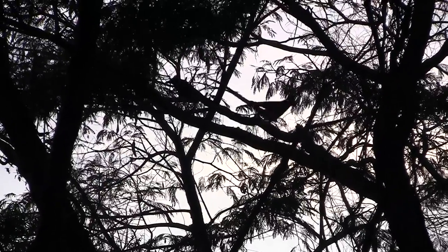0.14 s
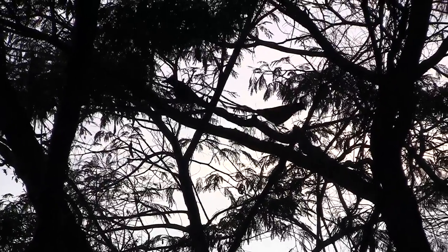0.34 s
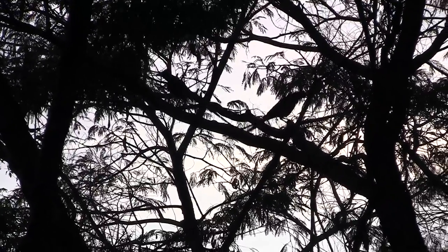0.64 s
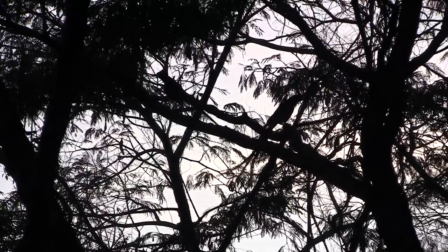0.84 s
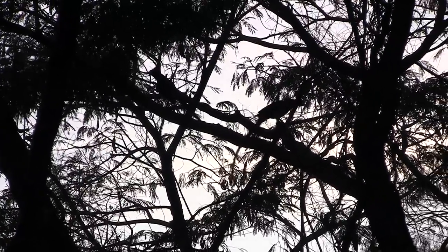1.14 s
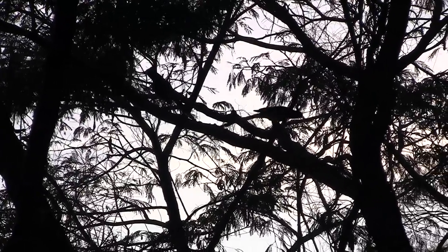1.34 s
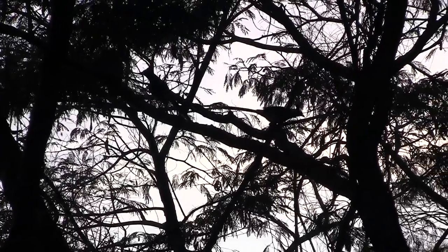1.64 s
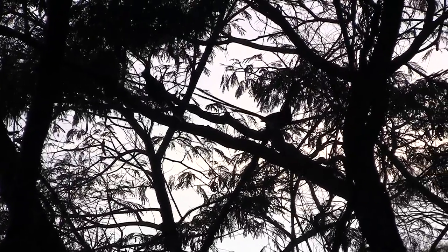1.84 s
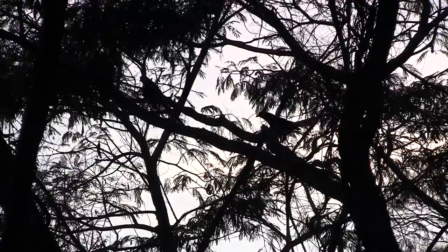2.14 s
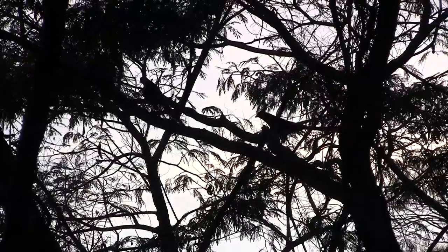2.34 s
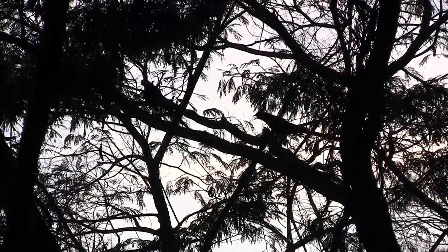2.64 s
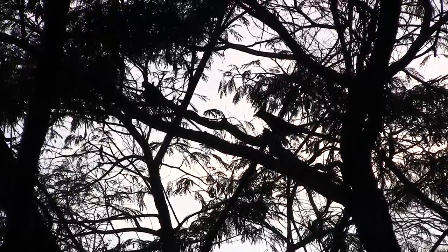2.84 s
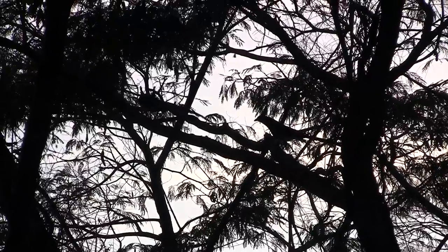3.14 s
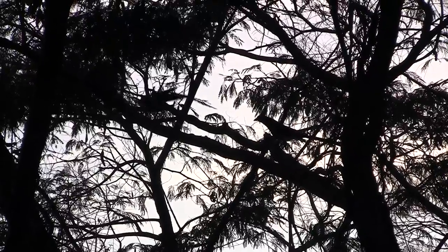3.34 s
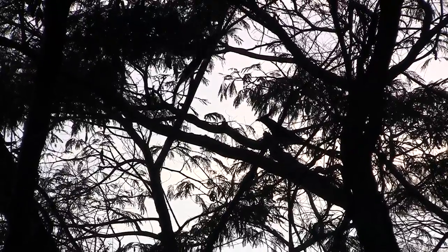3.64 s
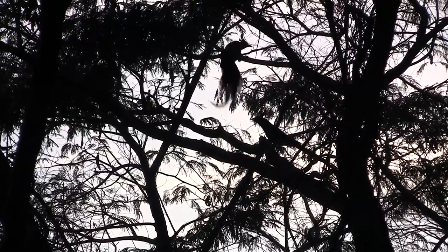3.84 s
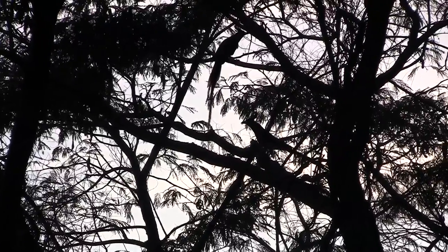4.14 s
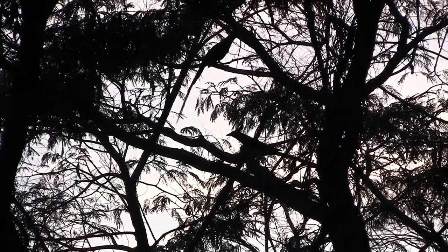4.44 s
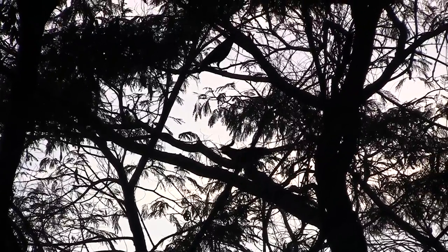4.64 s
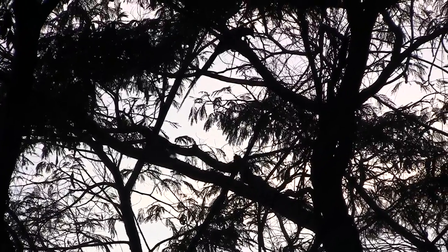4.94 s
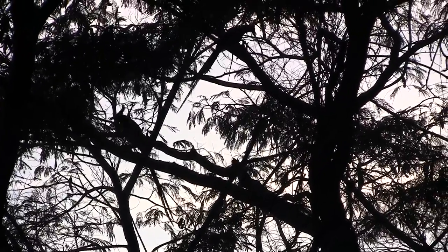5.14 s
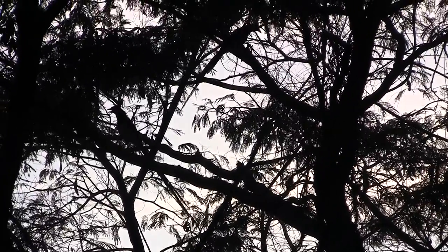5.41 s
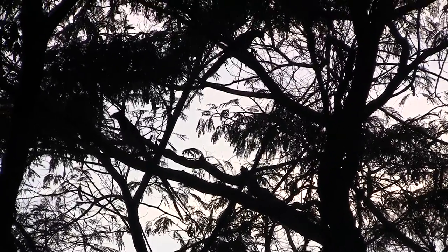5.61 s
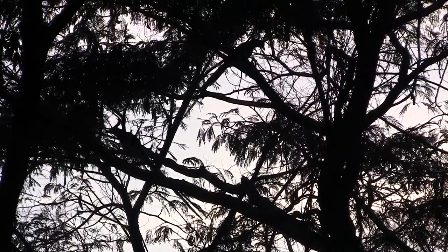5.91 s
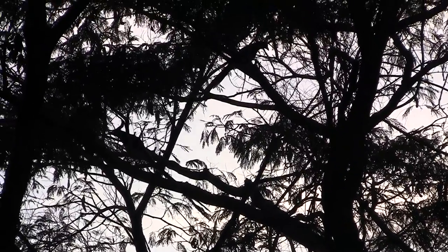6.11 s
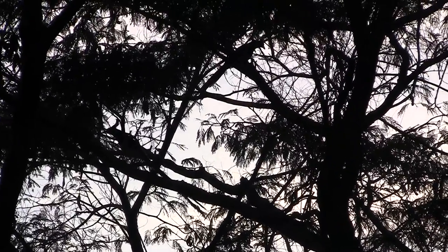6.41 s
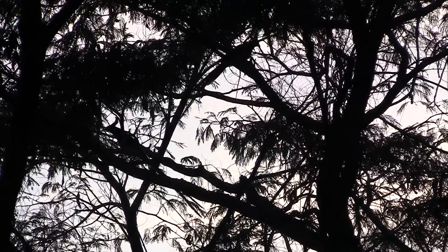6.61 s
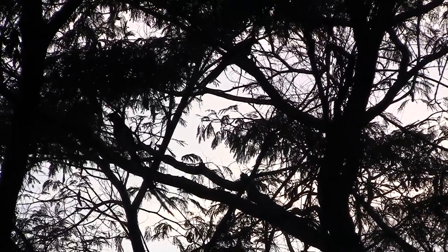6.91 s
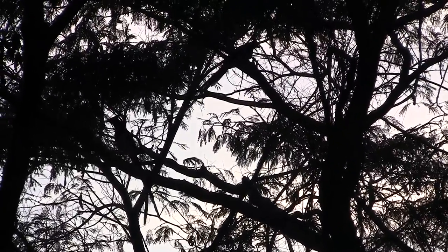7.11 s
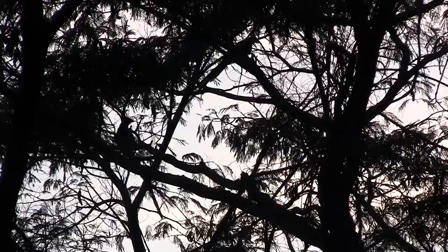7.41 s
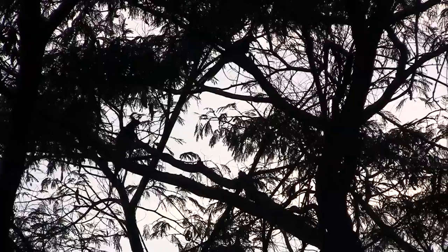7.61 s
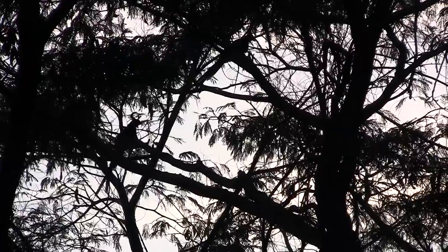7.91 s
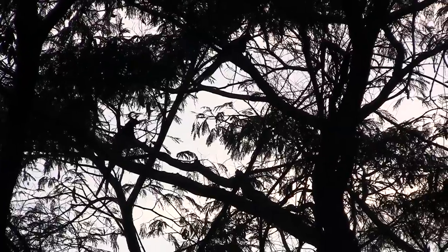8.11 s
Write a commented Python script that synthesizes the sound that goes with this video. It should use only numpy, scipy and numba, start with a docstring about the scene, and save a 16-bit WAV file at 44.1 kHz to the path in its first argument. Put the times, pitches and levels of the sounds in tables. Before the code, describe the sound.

A jay-like bird gives eight short harsh squawks at irregular gaps among trees, with tiny dry clicks and faint outdoor air between.

```python
"""A magpie-jay squawks eight times: each call moves from a clean low note into a harsh rasp and clean out again.
Pulses and noise drive a moving throat resonance with a shrill tone over it; trees scatter the call and ring on.
Between calls come small dry clicks (noise through ringing modes under a hiss), one soft rising whistle (a swept
sine) and a few dull bumps on the microphone (short low pulses), over quiet outdoor air (shaped stereo noise)."""
import sys
import numpy as np
from scipy import signal
from scipy.fft import rfft, irfft, next_fast_len
from scipy.io import wavfile
from scipy.ndimage import map_coordinates
from numba import njit

SR = 44100
rng = np.random.default_rng(int(sys.argv[2]) if len(sys.argv) > 2 else 0)


def master_out(mix):
    """Clip the mix to full scale and print it as 16-bit PCM to the path in sys.argv[1]."""
    frames = np.transpose(np.atleast_2d(mix))
    ceiling = np.clip(frames, -1, 1)
    pcm = np.round(ceiling * 32767).astype(np.int16)
    wavfile.write(sys.argv[1], SR, pcm)


N = 364266  # length in samples


def amp(db):
    """Decibels to gain."""
    return 10 ** (np.asarray(db) / 20)


def unit(x):
    """Scaled to rms 1."""
    return x / np.sqrt(np.mean(x ** 2) + 1e-20)


def along(points, hz):
    """(f/Hz, value) points read on a log frequency axis."""
    f, v = np.transpose(points)
    return np.interp(np.log(hz + 1), np.log(f + 1), v)


def curves(rows, t):
    """Each column after the time, read at the times t."""
    s, *cols = np.transpose(rows)
    return [np.interp(t, s, c) for c in cols]


def wobble(rate, size):
    """A smooth random curve, rate knots a second."""
    knots = rng.standard_normal(size + 4)[:int(size * rate / SR) + 4]
    return map_coordinates(knots, [np.arange(size) * rate / SR])


def filtered(x, response):
    """x times a response of frequency, zero-padded so that the ringing does not wrap round."""
    size = x.shape[-1]
    padded = next_fast_len(size + 8192)
    return irfft(rfft(x, padded) * response(np.fft.rfftfreq(padded, 1 / SR)), padded)[..., :size]


def coloured(x, points):
    """x through a (f/Hz, gain/dB) spectrum, at rms 1."""
    return unit(filtered(x, lambda hz: amp(along(points, hz))))


def add(track, sound, s):
    """Mix a sound into the track from time s on; whatever falls outside the track is cut."""
    i = round(s * SR)
    part = sound[..., max(-i, 0):N - i]
    track[..., max(i, 0):max(i, 0) + part.shape[-1]] += part


@njit
def resonate(x, turn, radius):
    """A two-pole resonance whose centre (radians a sample) moves."""
    y = np.zeros(len(x))
    for i in range(2, len(x)):
        feedback = 2 * radius * np.cos(turn[i]) * y[i - 1] - radius * radius * y[i - 2]
        y[i] = x[i] - x[i - 2] + feedback
    return y


def air(level_db=-52):
    """A quiet, almost steady outdoor rush: wide noise, leaning slightly to the right."""
    # spectrum of the rush: f/Hz, level/dB
    spectrum = [(15, -41), (25, -32), (48, -17), (84, -8), (178, -2), (260, -1.5), (349, -3), (399, -3.5),
                (741, -7.5), (945, -9.5), (1710, -13.5), (2360, -14), (5880, -20), (14300, -31),
                (15500, -63.5)]
    # how alike left and right are: f/Hz, likeness (0-1)
    likeness = [(60, 0.024), (240, 0.072), (950, 0.13), (3770, 0.053), (15000, 0.17)]

    def mid_side(hz):
        # this split of energy between mid and side sets the left-right likeness
        angle = np.arccos(np.clip(along(likeness, hz), -1, 1)) / 2
        return amp(along(spectrum, hz)) * [np.cos(angle), np.sin(angle)]

    mid, side = filtered(rng.standard_normal((2, N)), mid_side)
    rush = unit(np.array([mid + side, mid - side]))
    return rush * amp(level_db + 0.043 * wobble(2.36, N)) * amp([[-.4], [.4]])


def bumps(width_s=0.0048):
    """Handling nudges the microphone: a cycle or two of low pressure, mostly on the left."""
    # nudges: centre t/s, level/dB before the left and right gains, f/Hz
    nudges = [(0.165, -45, 103), (2.267, -45, 96), (2.462, -36.5, 95), (2.526, -45, 100),
              (3.195, -39.5, 95.5), (3.334, -39, 96.3)]
    t = np.arange(N) / SR
    push = np.zeros(N)
    for s, db, hz in nudges:
        window = np.exp(-((t - s) / width_s) ** 2 / 2)
        push -= amp(db) * np.sin(2 * np.pi * hz * (t - s)) * window
    return push * amp([[4], [-12]])


def clicks(ring_db=-11.5, hiss_db=-16.0, favour_db=7):
    """Small dry clicks: noise rings diffusely in a set of modes, under a hiss, and both die together."""
    # clicks: t/s, level/dB before the ring and hiss gains, hiss gain/dB on top of hiss_db,
    # favoured ring f/Hz, t60/s
    strikes = [(0.527, -28, 0.5, 2060, 0.28), (0.865, -36, 9, 4300, 0.19), (1.304, -28.5, -3, 5450, 0.26),
               (3.635, -29.5, 1.5, 2100, 0.23), (4.208, -29.5, -5, 1482, 0.18), (5.049, -44, 7, 5500, 0.17),
               (6.251, -31, 5, 3860, 0.27), (6.334, -31.5, 10.5, 4360, 0.0096),
               (6.787, -35.5, 4.5, 2105, 0.22), (7.395, -29.5, -4, 1486, 0.17)]
    # modes that every click rings with: f/Hz, width/Hz, level/dB
    ring_modes = [(917, 130, -4.5), (1513, 61, -0.5), (2064, 25, 3), (2360, 26, 2.5), (3344, 26, 3),
                  (4230, 50, -28), (4130, 46, 1), (4540, 29, -3.5), (5510, 60, -1), (7600, 70, -22)]
    # spectrum of the hiss: f/Hz, level/dB
    hiss_spectrum = [(700, -29), (1800, -10.5), (4200, -3), (5000, -9.5), (8000, -10), (13000, -20),
                     (16000, -29)]
    out, t = np.zeros((2, N)), np.arange(SR // 4) / SR

    def modes(hz):
        power = sum(amp(db) ** 2 / (1 + (2 * (hz - centre) / width) ** 2)
                    for centre, width, db in ring_modes)
        return np.sqrt(power)

    for s, db, treble_db, ring_hz, t60 in strikes:
        # each click brings out the modes around its own ring frequency
        favour = lambda hz: amp(favour_db * np.exp(-(np.log((hz + 1) / ring_hz) / .2) ** 2))
        ring = unit(filtered(rng.standard_normal((2, len(t))), lambda hz: modes(hz) * favour(hz)))
        hiss = coloured(rng.standard_normal((2, len(t))), hiss_spectrum)
        decay = amp(db - 60 * t / t60) * (1 - np.exp(-t / 0.00072))
        add(out, decay * (amp(ring_db) * ring + amp(hiss_db + treble_db) * hiss), s)
    return out


def whistle():
    """A soft pure note: one sine that sweeps upwards, centred."""
    # path of the note: t/s, f/Hz, peak level/dB
    path = [(4.045, 770, -68), (4.065, 840, -47.5), (4.095, 1030, -52), (4.122, 1320, -42),
            (4.135, 1545, -72)]
    t = np.arange(N) / SR
    hz, db = curves(path, t)
    sounding = (t > path[0][0]) * (t < path[-1][0])
    return amp(db) * np.sin(2 * np.pi * np.cumsum(hz) / SR) * sounding


def tail(t60, onset):
    """A stereo noise echo of about unit energy that builds up, then dies at its own speed at each frequency."""
    hz, t, z = signal.stft(rng.standard_normal((2, SR)), SR, nperseg=256)
    fade = amp(-60 * t / along(t60, hz)[:, None]) * (1 - np.exp(-(t + 0.0024) / onset))
    fade /= np.sqrt(np.mean(fade ** 2, axis=1, keepdims=True) * SR)
    return signal.istft(z * fade, SR, nperseg=256)[1][:, :SR]


def among_trees(call, scatter_t60=0.06):
    """The direct sound, its scatter off near branches and the long answer of the wood."""
    # which side the bird leans to: f/Hz, left minus right/dB
    side_lean = [(700, 1.5), (1300, 2), (2400, 5), (3300, 3), (4400, -1.5), (8000, 8), (15000, -6)]
    # near scatter against the direct sound: f/Hz, gain/dB
    branches = [(600, -3), (1500, -5), (2600, -0.5), (4500, 9.5), (14000, 0)]
    # decay of the wood: f/Hz, t60/s
    wood_t60 = [(500, 0.21), (1500, 1), (2600, 1.0), (4500, 0.73), (7000, 0.64), (12000, 0.54)]
    # answer of the wood: f/Hz, gain/dB
    wood_gain = [(600, -8.5), (1250, -15), (1600, -16), (2000, -19.5), (2450, -14.5), (2700, -16),
                 (3200, -13), (3900, -1.5), (6000, -11.5), (9000, -11), (14000, -9)]
    direct = np.pad(call, (0, SR - 1))
    near = signal.fftconvolve(call[None], tail([(1000, scatter_t60)], onset=0.00036), axes=1)
    far = signal.fftconvolve(call[None], tail(wood_t60, onset=0.0047), axes=1)
    scatter = lambda hz: amp(along(branches, hz))

    def lean(hz):
        # the divisor makes up for the energy that the scatter adds
        sides = amp(np.outer([.5, -.5], along(side_lean, hz)))
        return sides / np.sqrt(1 + scatter(hz) ** 2 / 2)

    close = filtered(direct + filtered(near, scatter), lean)
    return close + filtered(far, lambda hz: amp(along(wood_gain, hz)))


def gesture(t, length, db, attack, release, swell_db, throat_hz, treble_db, body_db, hoarse, broken):
    """Level, throat resonance, treble, body and hoarseness of a call: attack, hold with a break, release."""
    attack_db, release_db = 11.5, 10.5  # fall below the held level at either end
    faded_s, faded_db = .021, 4.5  # last stretch, already quiet, and its further fade
    break_at, break_width, break_db = 0.43, 0.18, -3  # shares of the call; level change at a full break
    sag_at, sag_width, sag_hz = .42, .25, 249.1  # shares of the call; mid-call dip of the resonance
    bill_shut_db = -6.5  # treble at either end, against the wide open bill
    weak_treble_db, weak_hoarse = 4.5, 0.42  # added where the voice starts and dies
    body_edge_db = -4  # the body thins towards both ends
    u = np.clip(t / length, 0, 1)
    starting = np.clip(1 - t / attack, 0, 1)
    ending = np.clip(1 - (length - faded_s - t) / release, 0, 1)
    dying = np.clip(1 - (length - t) / faded_s, 0, 1)
    breaking = np.exp(-((u - break_at) / break_width) ** 2)
    sag = np.exp(-((u - sag_at) / sag_width) ** 2)
    weak = starting + ending
    held_db = db + swell_db * (u - .5) + break_db * broken * breaking
    return (held_db - attack_db * starting - release_db * ending - faded_db * dying,
            throat_hz - sag_hz * sag,
            treble_db + bill_shut_db * (1 - np.sin(np.pi * u)) + weak_treble_db * weak,
            body_db + body_edge_db * (1 - sag),
            hoarse + broken * breaking + weak_hoarse * weak)


def squawk(start, end, *row, jitter=0.075, width_hz=380, ring_db=-3, flutter_db=0.8, throat_top_hz=4300):
    """One call: the syrinx scoops up to a piercing shriek, breaks into a hoarse rasp and glides out."""
    # throat part of the rasp: f/Hz, level/dB
    throat_spectrum = [(620, -50), (790, -13), (920, -17), (1090, -12.5), (1250, -4.5), (1420, -3),
                       (1660, -8.5), (1970, -3.5), (2200, -8.5), (2550, -0.5), (2900, -5.5), (3350, -1.5),
                       (3900, -7.5), (4800, -10.5)]
    # treble from the bill: f/Hz, level/dB
    bill_spectrum = [(3000, -27), (4200, -4.5), (5100, 4), (6600, 1), (7400, -6.5), (8500, -8),
                     (9900, -17.5), (11200, -16), (12500, -22.5), (14300, -35), (15500, -55)]
    scoop_s, drop_s, first_hz = .02, 0.026, 614.9  # glides at either end; pitch at the start
    rise_hz_per_s, pitch_wander = 900, 0.0549  # creep of the held pitch; its wander as a share
    steady_share = 0.25  # share of the pitch jitter left at the ends of the glides
    alternation = 0.86  # depth of the alternation of strong and weak pulses
    body_top_hz = 2220  # the body of the rasp lies below this
    *effort, held_hz, last_hz, clean_db, edge_hz = row
    size, length = SR // 4, end - start
    t = np.arange(size) / SR
    level_db, throat_hz, treble_db, body_db, hoarse = gesture(t, length, *effort)
    hoarse = np.clip(hoarse, .05, .95)
    gate = np.clip(t / 0.011, 0, 1) * np.clip((length - t) / 0.0073, 0, 1)

    # pitch: arch is 1 in the hold and 0 at either end
    arch = np.clip(np.minimum(t / scoop_s, (length - t) / drop_s), 0, 1)
    end_hz = np.where(t < length / 2, first_hz, last_hz)
    hold_hz = (held_hz + rise_hz_per_s * (t - length / 2)) * (1 + pitch_wander * wobble(130, size))
    pitch = end_hz * (hold_hz / end_hz) ** arch
    unsteady = jitter * np.sqrt(hoarse) * (steady_share + (1 - steady_share) * arch)
    phase = 2 * np.pi * np.cumsum(pitch * (1 + unsteady * wobble(1100, size))) / SR

    # uneven pulses, smeared over their cycle, with a puff of turbulence at every opening
    harmonics = sum(np.cos(k * phase + k * k / 2) for k in range(1, 12))
    pulses = unit(harmonics * (1 + .4 * arch * wobble(1100, size)))
    # under strain strong and weak pulses alternate, which adds partials halfway between the harmonics
    pulses = unit(pulses * (1 + alternation * arch * np.cos(phase / 2 + 2 * np.pi * rng.random())))
    puffs = unit(rng.standard_normal(size) * (1 + 0.5 * np.cos(phase)))
    source = np.sqrt(1 - hoarse) * pulses + np.sqrt(hoarse) * puffs
    source *= amp(0.47 * wobble(443.3, size))

    # rasp: the source in the throat, levelled over the hold, then given its body
    ring = resonate(source, 2 * np.pi * throat_hz / SR, np.exp(-np.pi * width_hz / SR))
    passband = lambda hz: (1 - 1 / (1 + (hz / edge_hz) ** 10)) / (1 + (hz / throat_top_hz) ** 10)
    rasp = filtered(coloured(source, throat_spectrum) + amp(ring_db) * unit(ring), passband)
    rasp /= np.sqrt(np.average(rasp ** 2, weights=arch + 1e-6))
    rasp += (amp(body_db) - 1) * filtered(rasp, lambda hz: 1 / (1 + (hz / body_top_hz) ** 20))

    # where the voice is clear, its energy locks onto the throat resonance as one shaky tone
    shriek_hz = throat_hz * (1 + .12 * np.sqrt(hoarse) * wobble(1000, size))
    shriek = np.sqrt(2) * np.sin(2 * np.pi * np.cumsum(shriek_hz) / SR)
    shriek *= unit(amp(2.4 * wobble(420, size)))
    clear = (1 - hoarse) ** 1.2 * (.25 + .75 * arch ** 2)
    treble = amp(treble_db) * coloured(source + puffs / 2, bill_spectrum)
    voice = np.sqrt(clear) * shriek + np.sqrt(1 - clear) * rasp + treble

    # the fundamental stands clear at either end and is weaker where it lies below 800 Hz
    fundamental = amp(clean_db + 3.35 * wobble(271.9, size)) * np.sin(phase) * np.minimum(pitch / 800, 1)
    return gate * (amp(level_db + flutter_db * wobble(242.6, size)) * voice + fundamental)


def jay():
    """All the squawks, each with its own echoes; the first is already under way at time 0."""
    # calls: start t/s, end t/s, level/dB before the trees, attack/s, release/s, swell over the call/dB,
    # throat resonance f/Hz, relative treble/dB, relative body/dB, hoarseness (0-1),
    # hoarseness added at the break (0-1), held pitch f/Hz, last pitch f/Hz,
    # clean fundamental level/dB, low edge of the rasp f/Hz
    calls = [(-.07, 0.074, -24, 0.028, 0.027, -11.5, 2500, -8, 5, 0.2, 0.32, 981, 406, -43.5, 810),
             (0.64, 0.785, -22.5, 0.045, 0.03, -1.5, 2667, -8, 0.5, 0.33, 0.07, 955.3, 448, -38, 770),
             (1.318, 1.468, -21, .02, 0.0089, 0, 2753, -7.5, 1.5, .24, 0.1, 953, 381, -41, 796),
             (2.744, 2.888, -22, 0.021, 0.012, 1, 2788, -5.5, 1, 0.42, .2, 976.6, 401, -39.5, 784),
             (3.838, 3.989, -19.5, 0.035, 0.017, 1, 2780, -10, -0.5, 0.31, 0.07, 923.4, 395, -43.5, 800),
             (4.739, 4.882, -21.5, 0.035, 0.011, -1.5, 2634, -8.5, 2.5, 0.23, 0.7, 922.6, 448, -39.5, 750),
             (5.558, 5.708, -19, 0.031, 0.022, 0, 2693, -9, 2, .3, 0.49, 930.7, 440, -40, 850),
             (6.947, 7.152, -21.5, 0.018, 0.015, -3.5, 2660, -6, 4, 0.66, 0.23, 1009, 1137, -45.5, 1106)]
    out = np.zeros((2, N))
    for row in calls:
        add(out, among_trees(squawk(*row)), row[0])
    return out


def scene():
    """The bird and the small sounds around it."""
    return jay() + whistle() + clicks() + bumps() + air()


def record(dry, top_hz=15700):
    """A sharp band limit: nothing is kept from top_hz up."""
    return filtered(dry, lambda hz: hz < top_hz)


dry = scene()
out = record(dry)
master_out(out)
```